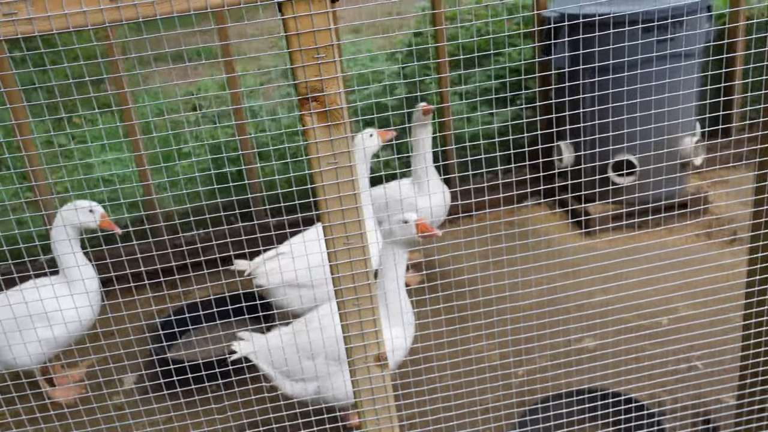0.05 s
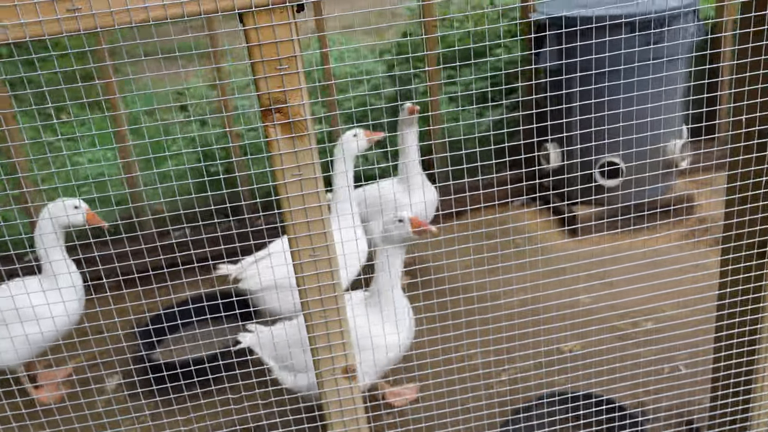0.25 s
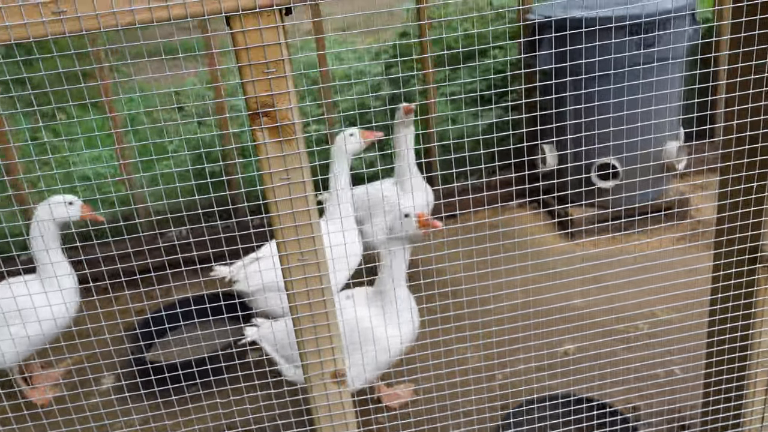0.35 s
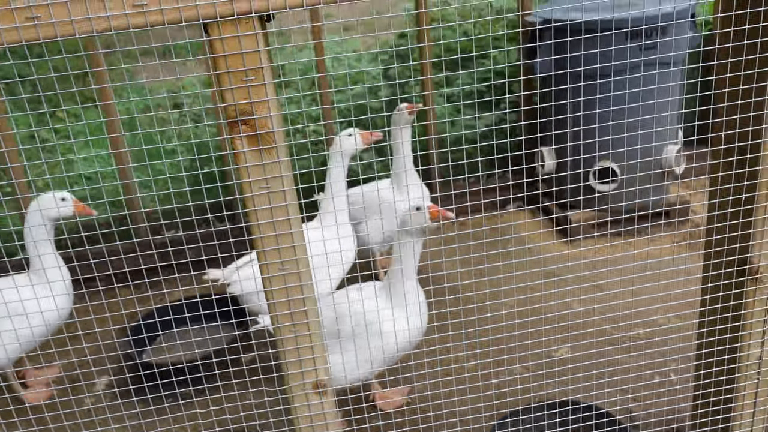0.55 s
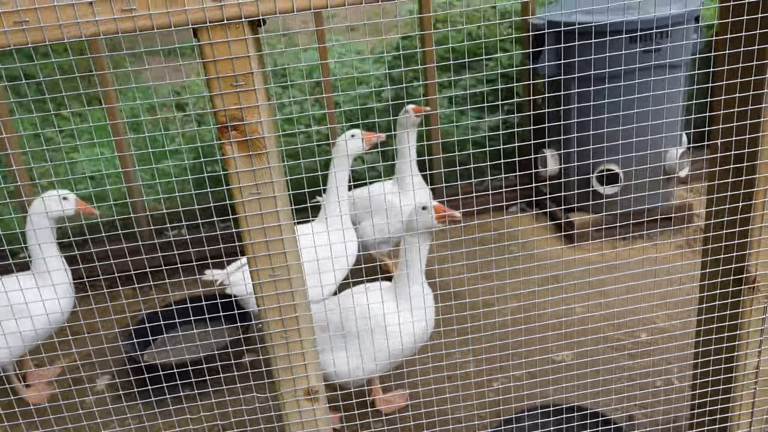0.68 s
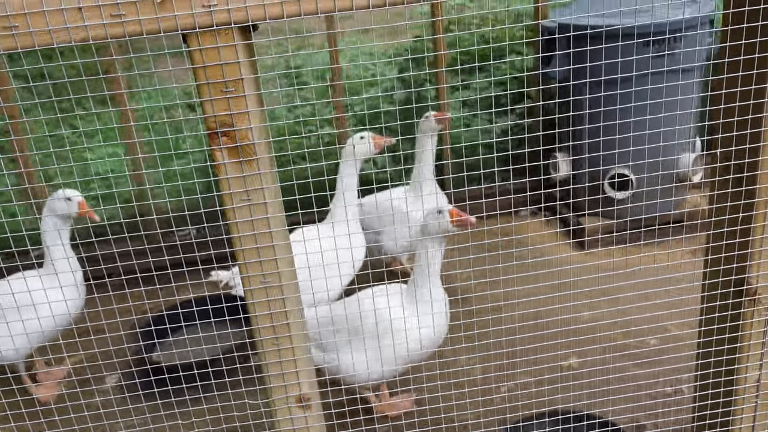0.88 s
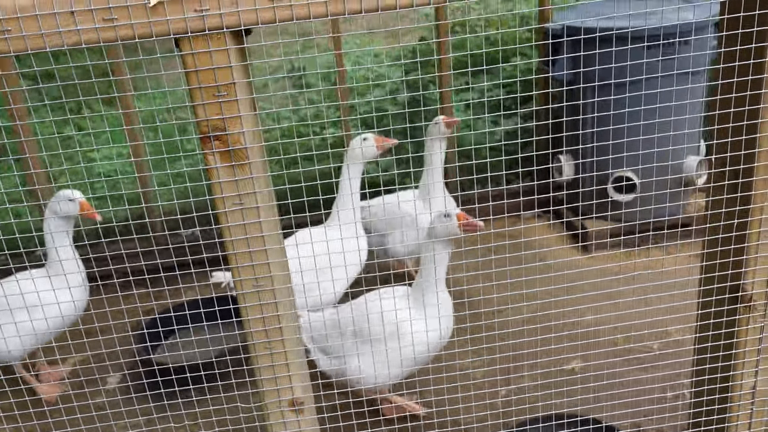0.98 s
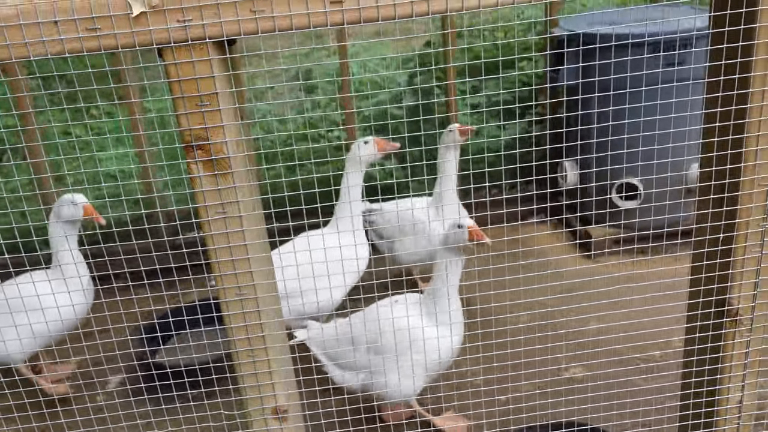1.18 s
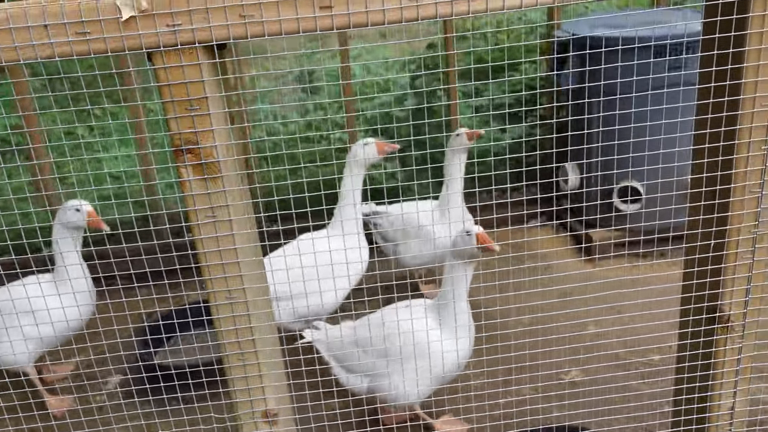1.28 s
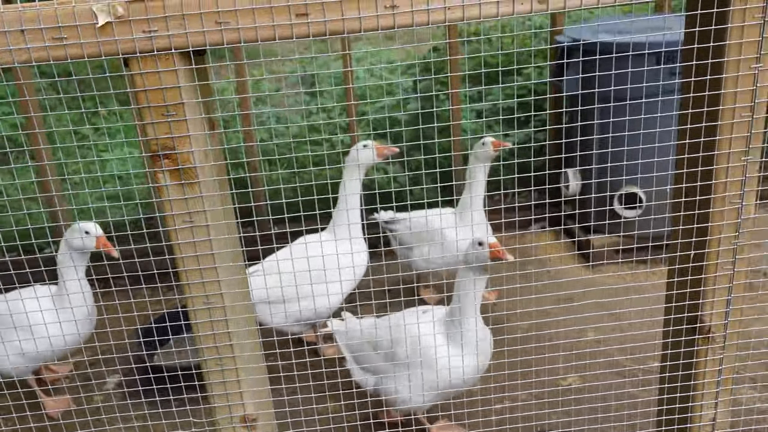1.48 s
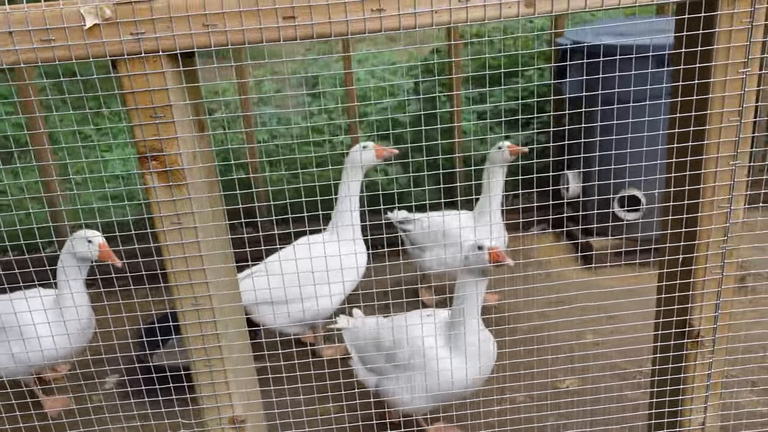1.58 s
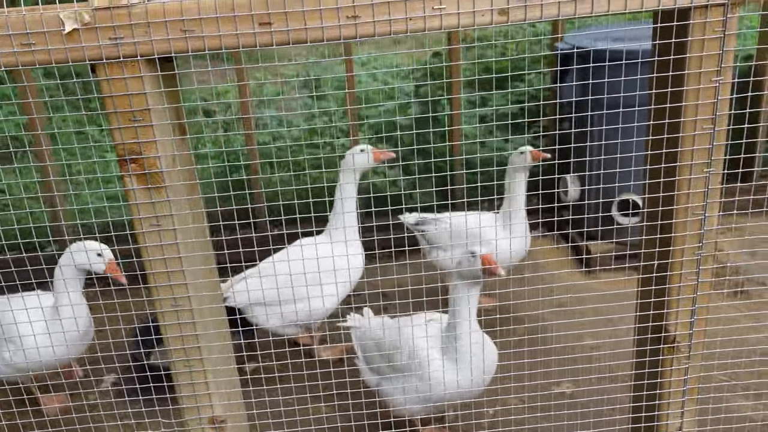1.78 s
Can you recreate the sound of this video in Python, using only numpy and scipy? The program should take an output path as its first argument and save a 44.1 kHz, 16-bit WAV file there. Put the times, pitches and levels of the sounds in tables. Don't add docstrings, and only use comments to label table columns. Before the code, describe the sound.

Loud brassy goose honks, after a few tiny foot ticks on boards, quicken and pile up for about a second, then stop; a quiet outdoor yard remains with soft air, insects and faint far bird rasps.

```python
import sys
import numpy as np
from scipy import signal
from scipy.fft import rfft, irfft, next_fast_len
from scipy.io import wavfile
from scipy.ndimage import uniform_filter1d

SR = 44100
rng = np.random.default_rng(int(sys.argv[2]) if len(sys.argv) > 2 else 0)


def inscribe(sig):
    pcm = np.round(np.clip(np.atleast_2d(sig).T, -1, 1) * 32767)
    wavfile.write(sys.argv[1], SR, pcm.astype(np.int16))


def invert_db(x):
    u = np.asarray(x, float) / 20
    return 10 ** u


N = 81585

JITTER = .035
DARKER = 0.13
CLEAR_PARTIALS = 19


def level(x, db):
    return x * invert_db(db) / np.sqrt(np.mean(x ** 2))


def filt(x, shape):
    n = next_fast_len(len(x) + 4096)
    f = np.arange(n // 2 + 1) * SR / n + 0.00077
    return irfft(rfft(x, n) * shape(f), n)[:len(x)]


def band(f, hz, width):
    return 1 / (1 + 1j * (f / hz - hz / f) * hz / width)


def walk(n, rate):
    k = max(int(SR / rate), 1)
    smooth = uniform_filter1d(uniform_filter1d(rng.standard_normal(SR // 4), k), k)
    return level(smooth[:n], 0)


def flicker(db):
    knots_db = rng.standard_normal(24)
    return invert_db(db * np.interp(np.arange(N), np.linspace(0, N, 24), knots_db))


def yard():
    # hz, density_db
    air_curve = [(35, -37.5), (60, -7), (282, -18), (1520, -22.5), (5550, -35), (7000, -30), (15000, -53)]
    curve_hz, curve_db = np.transpose(air_curve)

    def noise(shape, db):
        return level(filt(rng.standard_normal(N), shape), db)

    air = noise(lambda f: invert_db(np.interp(np.log(f), np.log(curve_hz), curve_db)) * (f > 50), -69)
    insects = noise(lambda f: band(f, 6900, 1000) ** 2, -82.5)
    wind = noise(lambda f: band(f, 13, 6.4) ** 2, -52)
    rumble = noise(lambda f: band(f, 35.7, 36) ** 2, -71)
    return air * flicker(1.0) + insects * flicker(1.8) + wind + rumble * flicker(3)


def flutter(length_s, u, phase, flutter_hz, rough):
    if not flutter_hz:
        return np.exp(1j * phase / 3)
    start_dip = 0.16 * np.exp(-u * length_s / 0.018)
    hz = flutter_hz * (1 - start_dip) * (1 + JITTER * rough * walk(len(u), 56))
    return np.exp(2j * np.pi * np.cumsum(hz) / SR)


def membrane(phase, turn, loss_db, rough, sides):
    n = len(phase)
    side_wander_db, smear, wander_hz = 5, .42, 160
    k = np.arange(1, 37)[:, None]

    def twist():
        fixed = np.exp(1j * rng.uniform(-np.pi, np.pi, k.shape) * np.minimum(k / 4, 1))
        drift = [invert_db(side_wander_db * rough * walk(n, 80)) * np.exp(2j * rough * walk(n, 80))
                 for _ in range(6)]
        return fixed * np.tile(drift, (6, 1))

    shake = 1 + invert_db(sides[0]) * turn * twist()
    shake = shake + invert_db(sides[1]) * turn ** 2 * twist()
    shake = shake + invert_db(sides[2]) / turn * twist()
    height = (k / CLEAR_PARTIALS) ** 2
    wander = np.array([walk(n, r) + 1j * walk(n, r) for r in wander_hz * (1 + height[:, 0])])
    wander = wander * np.minimum(smear * rough * k + height, 2)
    steady = np.sqrt(1 + np.mean(abs(wander) ** 2, axis=1, keepdims=True))
    spread = rng.uniform(-np.pi, np.pi, k.shape) * np.minimum(k / 8, 1)
    gain = invert_db(-loss_db * DARKER * np.minimum(k, CLEAR_PARTIALS))
    partials = shake * gain * np.exp(1j * (k * phase + spread)) * (1 + wander) / steady
    return partials.sum(axis=0).real


def gated_air(phase, loss_db):
    puffs = rng.standard_normal(len(phase)) * (2.9 + np.cos(phase)) * invert_db(-loss_db * DARKER * 11)
    return filt(puffs, lambda f: 1 / (1 + 1390 / (1j * f)) ** 2)


def windpipe(x, pipe_db):
    # centre_hz, width_hz
    resonances = [(500, 220), (900, 450), (1300, 360), (1710, 103), (2100, 91), (2550, 121), (2900, 140),
                  (3290, 199), (4100, 870), (5200, 2380), (6500, 3500), (8900, 3000), (12500, 8200)]
    throat_top_hz, beak_top_hz, low_cut_hz = 6000, 11100, 380

    def shape(f):
        total = 0
        for j, ((hz, width_hz), db) in enumerate(zip(resonances, pipe_db)):
            throat = (1 + 1j * f / throat_top_hz * (hz < throat_top_hz)) ** 2
            total = total + (-1) ** j * invert_db(db) * band(f, hz, width_hz) / throat
        c = low_cut_hz / (1j * f)
        return total / (1 + c ** 2 + 1.244 * c) ** 2 / (1 + 1j * f / beak_top_hz) ** 2

    return filt(x, shape)


def honk(length_s, swell_db, top_hz, place, rise, fall, flutter_hz, rough, sides, pipe_db, edge_s):
    arch_power, shimmer_db, air_db, murk_db = 1.6, 1, 5.5, -25
    attack_s, release_s = .0015 + edge_s, .009 + edge_s
    n = int(np.clip(length_s, .02, .2) * SR)
    u = np.arange(n) / n
    bow = np.where(u < place, (place - u) / place, (u - place) / (1 - place))
    bow = np.abs(bow) ** arch_power
    loss_db = swell_db * bow

    jitter = JITTER * rough ** 2 * walk(n, 500) + JITTER * rough * walk(n, 120) / 4
    hz = top_hz * (1 - np.where(u < place, rise, fall) * bow) * (1 + jitter)
    phase = 2 * np.pi * np.cumsum(hz) / SR
    turn = flutter(length_s, u, phase, flutter_hz, rough)

    pulses = level(membrane(phase, turn, loss_db, rough, sides), 0)
    source = pulses * invert_db(shimmer_db * rough * walk(n, 130))
    source = source + level(gated_air(phase, loss_db), air_db) * rough
    edges = np.minimum(u * length_s / attack_s, (1 - u) * length_s / release_s)
    env = invert_db(-loss_db) * np.clip(edges, 0, 1)

    pad = np.zeros(1500)
    voice = windpipe(np.append(source * env, pad), pipe_db)
    voice = voice / np.sqrt(np.mean(voice[:n] ** 2) / np.mean(env ** 2))
    murk = filt(rng.standard_normal(n), lambda f: band(f, 380, 180) ** 2)
    murk = env * level(murk, murk_db + sides[3] / 2)
    hum = invert_db(sides[3] - 12.0) * env ** 1.2 * (turn.real + 0.2 * (turn ** 2).real)
    return voice + np.append(murk + hum, pad)


def geese():
    # start_s, length_s, level_db, swell_depth_db
    calls = [(0.18, 0.091, -23, 5), (0.332, 0.11, -21.5, 8.5), (.487, 0.13, -20, 8), (0.648, 0.146, -16, 8),
             (0.769, 0.051, -24.5, -0.5), (0.81, .155, -18, 5), (0.923, 0.079, -22.5, 3),
             (0.985, 0.077, -23.5, -4.5), (1.03, 0.077, -21, -0.5), (1.085, 0.14, -23, 2.5),
             (0, 0.046, -60.5, 12), (1.351, 0.12, -53.5, 1.5), (1.422, 0.22, -62, 0),
             (1.578, 0.11, -54.5, -1.5), (1.815, 0.069, -61.5, 10), (0.843, 0.07, -22.5, 10.5),
             (1.199, 0.11, -39, 31)]
    # top_hz, top_place_0_1, rise_share, fall_share, flutter_hz (0: locked to pitch / 3)
    pitches = [(506, .49, .19, .16, 200), (480, .5, .11, .05, 0), (490, .48, .08, .1, 0),
               (549, .36, .18, .19, 166), (470, .5, .03, .04, 141), (556, .43, .27, .21, 150),
               (517, .4, .03, .01, 160), (484, .4, .03, .04, 152), (578, .3, .05, .08, 152),
               (497, .55, .05, .03, 156), (520, .2, .02, .02, 150), (525, .4, .03, .06, 150),
               (540, .5, .06, .02, 150), (532, .55, .03, .03, 150), (520, .6, .02, .02, 150),
               (485, .5, .04, .04, 150), (640, .2, .02, .2, 150)]
    roughness = (.25, .38, .15, .23, .35, .2, .18, .6, .55, .6, .8, .66, .85, .66, .8, .62, .9)
    # upper_sideband_db, second_sideband_db, lower_sideband_db, hum_db
    voices = [(-11, -20, -18, -45), (-9, -1, -8, -6), (-6, 1, -6, -5), (-10, 3, -12, -8),
              (-8, -10, -12, -12), (-18, -20, -18, -30), (-18, -20, -20, -40), (-3, -6, -6, -10),
              (2, 1, -8, -8), (-5, -6, -8, -14)] + [(-6, -6, -6, -40)] * 7
    callers = (0, 1, 9, 2, 5, 3, 8, 6, 10, 11, 4, 12, 7, 13, 4, 14, 14)
    birds_db = [(3.5, 4.5, -17.5, -4, -0.5, 0, 1.5, 5.5, -13.5, -19.5, -22.5, -25.5, -41),
                (0.5, 0, 0.5, 1.5, -4, 0.5, -1, 1, -24, -20, -27, -21.5, -46.5),
                (-3, -2, -3.5, -2, 1, -1.5, 2, -2, -10.5, -16, -26, -21.5, -39.5),
                (3, 4, 4, 0.5, 4, 2.5, 7, 2, -4, -10.5, -17.5, -16, -47.5),
                (-13.5, -1.5, 14, 15, 6, 11, -7, 6, 0, 4, -25.5, -32.5, -53.5),
                (-2.5, -3, -3.5, -0.5, -7.5, -6.5, -11.5, -15, -12, -19.5, -26, -28.5, -46),
                (-5, -6, -5.5, -2.5, -7.5, -5, -4, -4, -13.5, -18, -32.5, -33, -46.5),
                (-20, -14, -8.5, 1.5, 0, 0, -5, -11.5, -9, -9.5, -23.5, -33, -50.5),
                (-7, 1.5, -15, -22, -5, -5.5, -8.5, 2, -30.5, -30, -28.5, -42, -60),
                (0.5, 1, -1, 2, -0.5, 3.5, 2, 1, -24.5, -21.5, -22.5, -19.5, -42),
                (-4, -0.5, -3, -7.5, 1.5, -1.5, -1.5, -6, -19.5, -18.5, -33, -24.5, -51.5),
                (-3.5, -5.5, -5, -1.5, -2, -5, -9, -4, -9.5, -16.5, -26.5, -30, -46.5),
                (-32, -27, 0, 12.5, 11.5, -4.5, -14, -2, -24, -8, -24.5, -29, -54.5),
                (-21, -13.5, 2.5, 13, 12, 4, 0, -19, -17, -1.5, -19.5, -37, -52),
                (-3, -7, 0, 3.5, 2.5, -10, -10.5, -7.5, -19, -18.5, -28.5, -31.5, -42.5)]
    out = np.zeros(N + SR)
    for call, pitch, rough, sides, bird in zip(calls, pitches, roughness, voices, callers):
        start_s, length_s, db, swell_db = call
        edge_s = .035 if rough > .65 else .014 if rough > .45 else 0
        sound = invert_db(db) * honk(length_s, swell_db, *pitch, rough, sides, birds_db[bird], edge_s)
        i = max(int(start_s * SR), 0)
        out[i:i + len(sound)] += sound
    return out[:N]


def ticks():
    # start_s, level_db
    steps = [
        (.127, -44),
        (.07, -60),
        (.103, -62),
    ]

    def impulse(start_s, gain):
        return gain * (np.arange(N) == int(start_s * SR))

    feet = np.zeros(N)
    for start_s, db in steps:
        feet[int(start_s * SR)] = invert_db(db) * 8
    feet = filt(feet, lambda f: band(f, 1530, 1500) ** 2)
    puff = filt(impulse(.183, invert_db(-32) * 30), lambda f: band(f, 160.6, 130) ** 2)
    beak = filt(impulse(.654, invert_db(-22.5)), lambda f: band(f, 13500, 9000) ** 2)
    return feet + puff + beak


def pen(x):
    t = np.arange(SR // 2) / SR
    stir_hz, stir_share = 90, .85

    def tail(db, t60_s):
        unit = np.sqrt(2 * np.log(1000) / t60_s / SR)
        return invert_db(db) * rng.standard_normal(len(t)) * invert_db(-60 * t / t60_s) * (t > .003) * unit

    echo = filt(tail(-9, 0.12) + tail(-9, 0.27), lambda f: band(f, 1300, 5100))
    stir = level(filt(rng.standard_normal(N), lambda f: 1 / (1 + 1j * f / stir_hz) ** 4), 0)
    stir = stir * stir_share + np.sqrt(1 - stir_share ** 2)
    direct = filt(x, lambda f: 1 - .8 * band(f, 7500, 1300))
    return direct + signal.fftconvolve(x * stir, echo)[:N]


def scene():
    return (pen(geese() + ticks()) + yard())[None]


def band_limit(x):
    return signal.sosfilt(signal.butter(12, 15720, fs=SR, output="sos"), x)


def record(dry):
    top_cut = signal.ellip(8, .2, 80, 15500, fs=SR, output="sos")
    return band_limit(signal.sosfilt(top_cut, dry))


dry = scene()
out = record(dry)
inscribe(out)
```